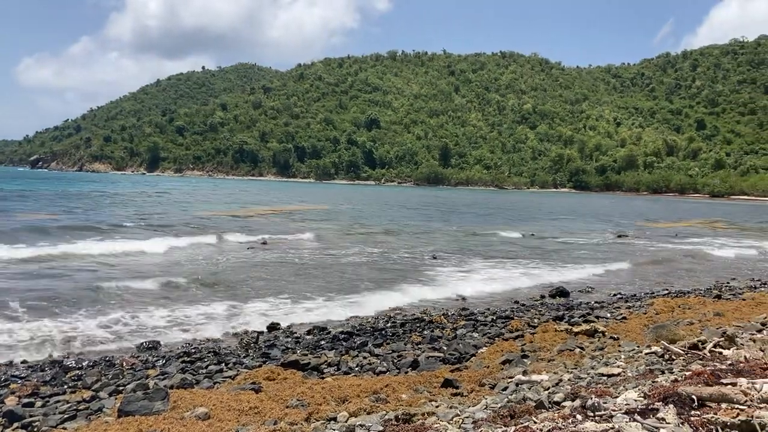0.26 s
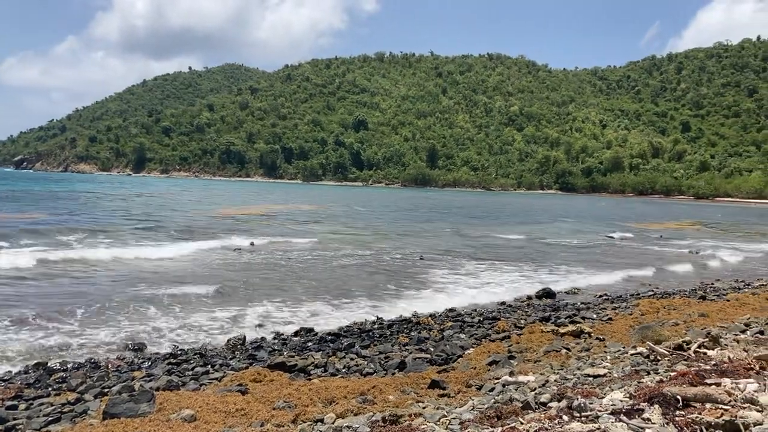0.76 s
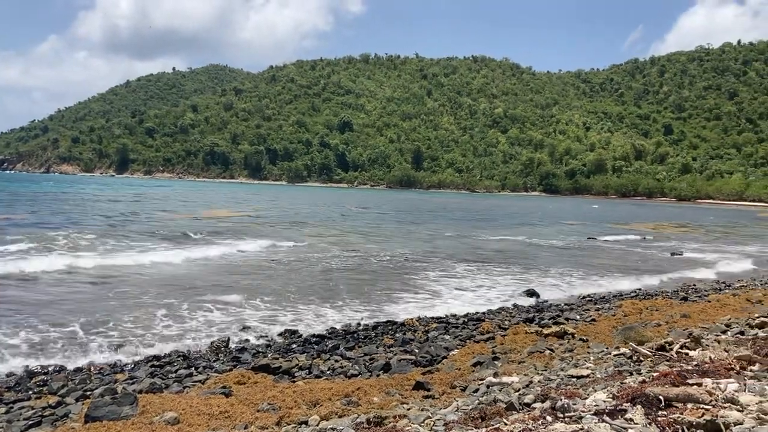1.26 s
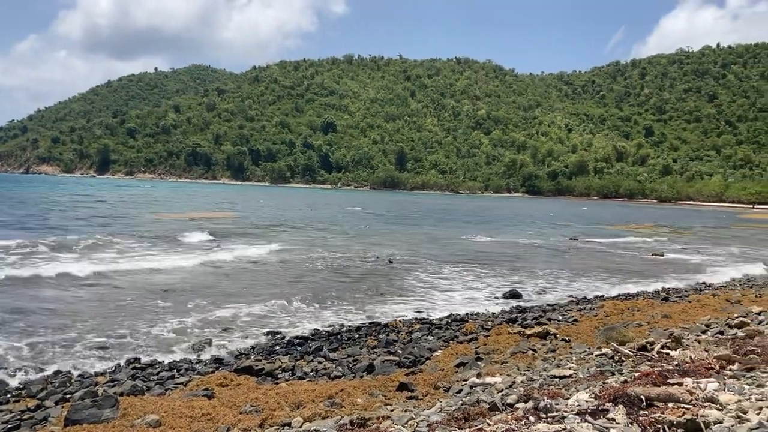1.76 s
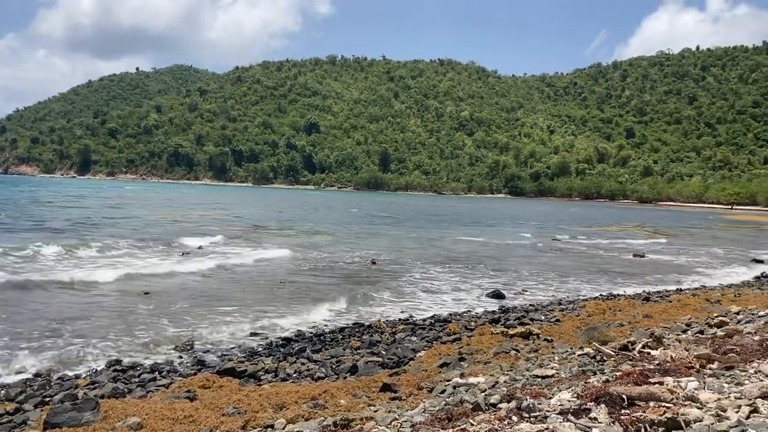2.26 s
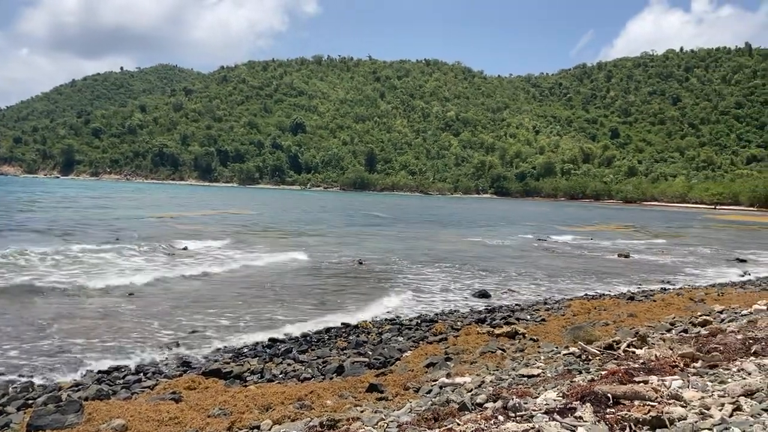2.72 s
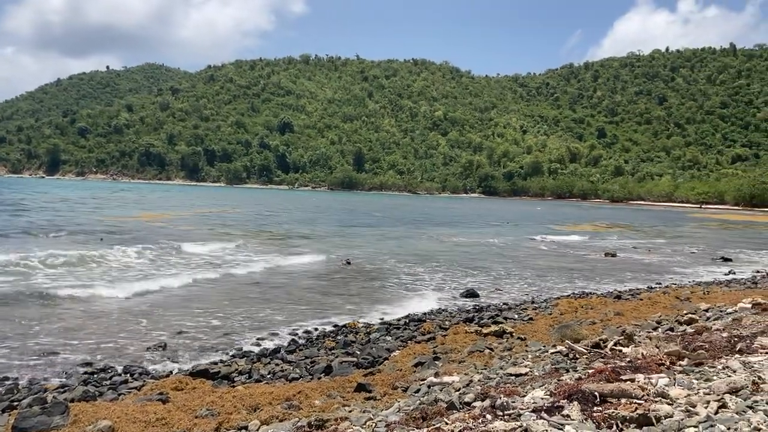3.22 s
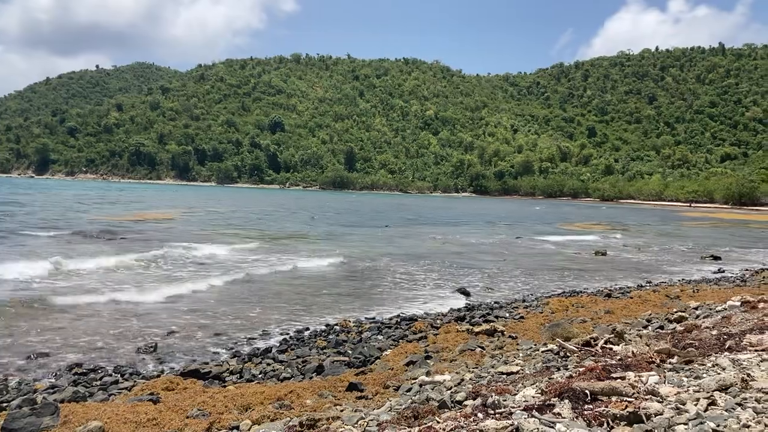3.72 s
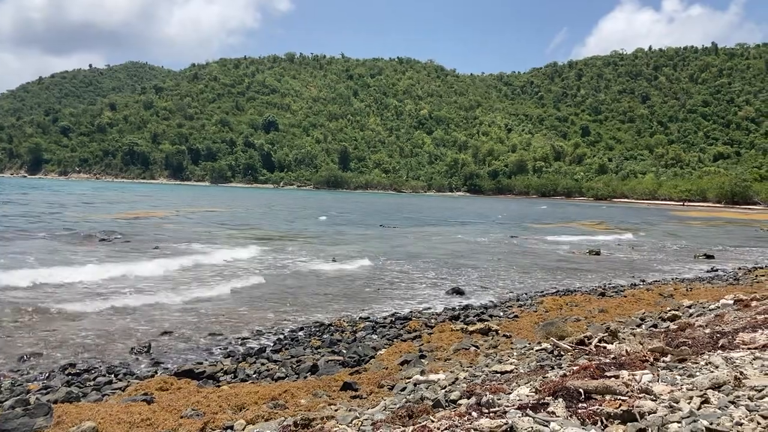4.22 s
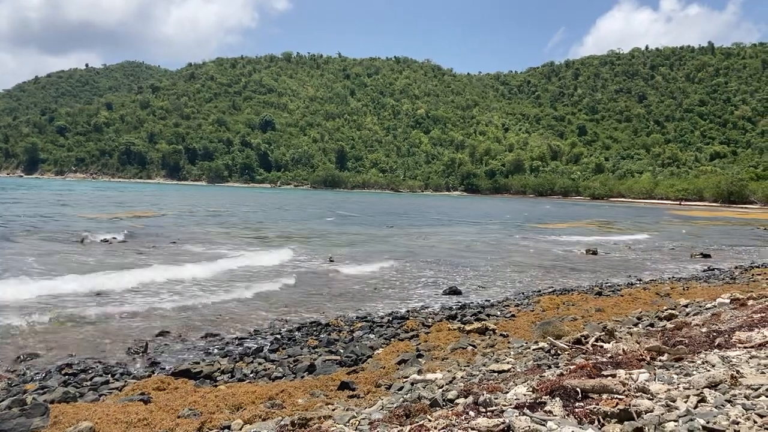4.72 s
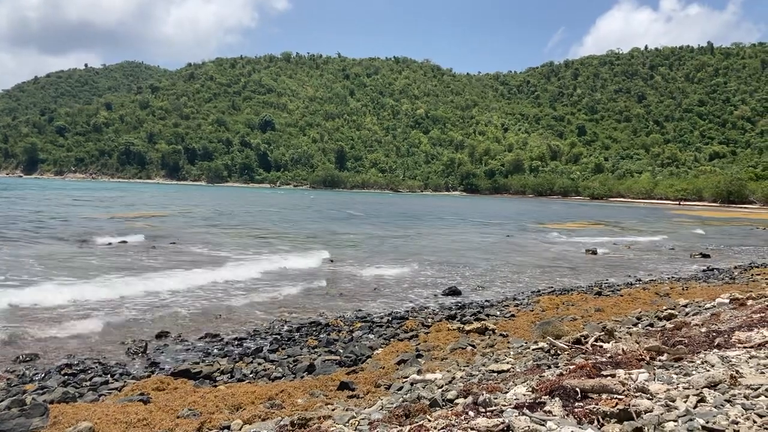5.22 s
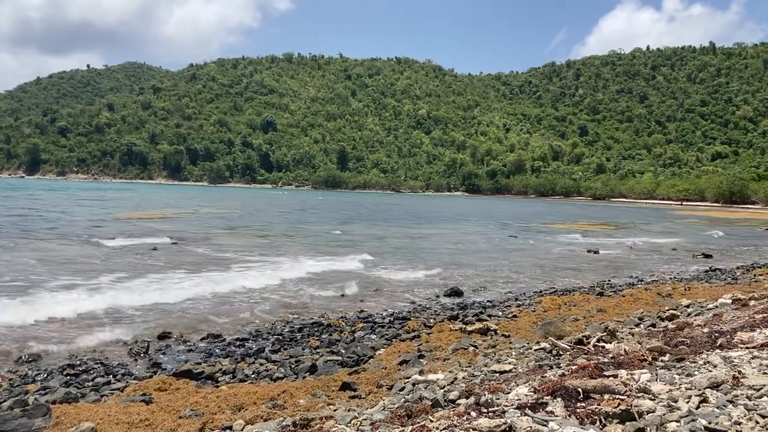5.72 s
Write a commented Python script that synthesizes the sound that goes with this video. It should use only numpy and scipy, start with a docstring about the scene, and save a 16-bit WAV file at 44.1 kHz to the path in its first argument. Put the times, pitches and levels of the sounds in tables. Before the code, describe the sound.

Close, steady surf wash on cobbles, mid-toned with soft fizz and watery gurgle, spread wide in stereo. Over it, breeze strikes an unshielded handheld microphone as short, dull, irregular thuds and flutters, mostly central. They begin strongly, thin out between one and two seconds, return lightly, and become dense and booming in the last second and a half. Open air, no echo.

```python
"""A cobble beach: small waves break and wash to the left of a hand-held stereo microphone.
The surf is noise in third-octave bands that swell, with ringing bubbles; each port has its own colour,
and a phase lead and partial coherence set the two apart. A breeze buffets the ports in low lumps, as
coloured noise and short swings; for the first two seconds the low wind noise is also wide, with a part
of opposite sign on the two sides."""
import sys
import numpy as np
from scipy import signal
from scipy.fft import rfft, irfft
from scipy.io import wavfile
from scipy.ndimage import uniform_filter1d

SR = 44100
rng = np.random.default_rng(int(sys.argv[2]) if len(sys.argv) > 2 else 0)


def dump_mix(stems):
    """Bounce the given channels to the path in sys.argv[1] as a 16-bit WAV at rate SR."""
    frames = np.atleast_2d(stems).T  # one column per channel
    limited = np.clip(frames, -1, 1)  # hard clip at full scale
    pcm = np.round(limited * 32767).astype(np.int16)
    wavfile.write(sys.argv[1], SR, pcm)


N = 263718
HZ = np.maximum(np.arange(N // 2 + 1) * SR / N, 1)  # frequency of each bin, kept above zero

# Single eddies at the ports. Each row: time in seconds, half of BUFFET_S before the middle of the swing,
# peak in dB before the bass cut, pitch in Hz.
BUFFETS = [(0.165, -20, 78), (0.236, -21, 92), (0.268, -25, 75), (.325, -22, 83), (.335, -21.5, 260),
           (.347, -15, 85), (.35, -28.5, 410), (.378, -26, 72), (0.401, -42, 65), (0.494, -24, 65),
           (0.544, -23, 70), (.575, -28, 233), (.585, -32, 380), (.612, -25, 62), (0.748, -27, 75),
           (0.769, -35, 75), (0.808, -31, 181), (0.913, -32, 70), (.997, -30.5, 225), (1.168, -29, 262),
           (1.238, -25.5, 268), (1.277, -33, 192), (1.34, -30.5, 190), (1.589, -27, 65),
           (1.661, -28.5, 211), (1.965, -30, 97), (2.324, -23, 70), (2.401, -24.5, 115), (2.51, -29, 110),
           (2.533, -24, 205), (2.55, -25, 100), (2.603, -28, 102), (2.613, -38, 323), (2.642, -27.5, 70),
           (2.87, -30, 81), (3.136, -28, 103), (3.249, -29, 150), (3.39, -30, 60), (3.47, -31, 55),
           (3.527, -20.5, 144), (3.635, -31, 70), (3.833, -28, 175), (3.976, -30.5, 237), (4.1, -28.5, 295),
           (4.124, -25, 179), (4.189, -22.5, 235), (4.21, -25, 125), (4.245, -24, 113), (4.558, -20, 110),
           (4.634, -30, 81), (4.67, -17, 80.5), (4.695, -17, 101), (4.731, -19.5, 148), (4.772, -25.5, 240),
           (4.801, -22, 103.4), (4.857, -21, 98), (5.159, -31, 94), (5.214, -35, 550), (5.222, -22, 79),
           (5.259, -28, 75), (5.306, -24, 70), (5.375, -31, 300), (5.389, -27, 75), (5.489, -19, 123),
           (5.564, -24, 260), (5.574, -16.5, 91), (5.645, -30, 130), (5.694, -22.5, 102), (5.697, -36, 523),
           (5.792, -22, 79.4), (5.815, -24, 102), (5.901, -28, 75), (5.937, -19, 125)]
BUFFET_S = 0.02626  # shortest swing, in seconds
# Spectra of the low and middle wind registers. Each row: frequency in Hz, relative density in dB per Hz.
THUD = [(20, -34), (35, -13), (55, -3), (80, 0), (98, -7), (135, -36), (400, -90)]
FLUTTER = [(20, -70), (60, -32), (90, -21.5), (125, -1), (170, -4.5), (210, -6.5), (300, -61), (800, -90)]


def from_db(db):
    """Decibels to amplitude gain: 20 dB is a factor of ten."""
    return 10 ** (np.asarray(db) / 20)


def rms_one(x):
    """Normalisation to unit root-mean-square."""
    return x / np.sqrt(np.mean(x ** 2) + 1e-20)


def in_time(rows):
    """Linear interpolation of each column over the seconds in the first, sample by sample."""
    seconds, *columns = np.transpose(rows)
    return [np.interp(np.arange(N) / SR, seconds, column) for column in columns]


def over_hz(points):
    """Interpolation on a logarithmic frequency axis, bin by bin."""
    hz, value = np.transpose(points)
    return np.interp(np.log(HZ), np.log(hz), value)


def drift(corner_hz):
    """Slow random modulation of unit rms: noise through two equal one-pole low-passes."""
    step = 40  # samples between the coarse values
    pole = np.exp(-2 * np.pi * corner_hz * step / SR)
    noise = rng.standard_normal(N // step + 2002)
    slow = signal.lfilter([1], [1, -2 * pole, pole * pole], noise)[2000:]  # drop the onset
    return np.interp(np.arange(N) / step, np.arange(len(slow)), rms_one(slow))


def high_pass(x, hz, order):
    """Zero-phase Butterworth magnitude: a bass cut without delay."""
    return irfft(rfft(x) / np.sqrt(1 + (hz / HZ) ** (2 * order)), N)


def foam(fizz_db, body_db, patchy_db, together_db):
    """Amplitude-modulated band noise: third-octaves swell independently, and slightly in common."""
    swell_db = 1.13
    edges = 100 * 2 ** (np.arange(24) / 3)
    white = rng.standard_normal((2, N))
    together = together_db * drift(2.0)
    out = 0
    for k, (low, high) in enumerate(zip(edges[:-1], edges[1:])):
        band_pass = signal.butter(2, [low, high], "band", fs=SR, output="sos")
        band = signal.sosfilt(band_pass, white[k % 2])
        treble = np.clip(np.log2(low / 2500) / 2, 0, 1)
        bass = np.clip(np.log2(1100 / low) * 2, 0, 1)
        own_db = patchy_db * drift(11.3) + swell_db * drift(2.8)
        out = out + band * from_db(treble * fizz_db + bass * body_db + together + own_db)
    return rms_one(out)


def bubbles(per_s, cycles):
    """Damped resonance of trapped air: random pops, clustered by pitch, fall 60 dB in the given cycles."""
    cluster_db, cluster_hz = 5.0, 6.0  # swing of the rate of pops, and corner of that swing
    sizes = from_db(2.0 * np.minimum(rng.exponential(1, N), 4)) * rng.choice([-1, 1], N)
    dealt, chance = rng.integers(0, 36, N), rng.random(N)  # which pitch a pop would take
    born = [chance < per_s * from_db(cluster_db * drift(cluster_hz)) / SR for register in range(6)]
    out = 0
    for k, hz in enumerate(np.geomspace(1050, 8000, 36)):
        r, w = from_db(-60 * hz / (cycles * SR)), 2 * np.pi * hz / SR
        pops = np.sqrt(hz) * sizes * born[k // 6] * (dealt == k)
        # the tiny offset avoids denormal numbers
        out = out + signal.lfilter([0, np.sin(w)], [1, -2 * r * np.cos(w), r * r], pops + 1e-18)
    return rms_one(out)


def surf():
    """Partial coherence: one wash reaches both ports with a phase lead, a scattered one the right alone."""
    # The wash. Each row: time in seconds, surf level in dB in the middle band, treble boost in dB,
    # bass boost in dB.
    wash = [(0, -37.5, -3, 1.5), (.4, -37.5, -0.5, 1), (.8, -38, -.5, -0.5), (1.15, -37.5, .5, 1.5),
            (1.45, -38, 1.5, 2.5), (1.85, -39.5, -0.5, 1.5), (2.2, -39, -1.5, 2), (2.55, -39.5, 1.5, 4),
            (2.9, -38.5, -0.5, 2.5), (3.3, -38.5, -0.5, 4), (3.7, -36.5, -1, 2), (4.0, -38, -0.5, 4.5),
            (4.25, -37.5, -.5, 3.5), (4.55, -37.5, 0.5, 3), (4.9, -39, .5, 3.5), (5.25, -38.5, 0, 0.5),
            (5.6, -40, -0.5, 2.5), (5.98, -39.5, -1, 0)]
    # Colour of the surf at each port. Each row: frequency in Hz, gain in dB.
    left_colour = [(380, -8), (450, -.5), (510, 0), (620, -.5), (770, -.2), (880, -5.8), (1010, -3.2),
                   (1200, -.6), (1300, -1.6), (1450, -4.5), (1650, -3), (2500, -7.2), (2750, -10.6),
                   (3050, -9.8), (3600, -13.3), (4050, -11), (6300, -17), (7300, -18), (9500, -15.8),
                   (12500, -21), (14200, -28), (15800, -29)]
    right_colour = [(400, -7.3), (480, -5.2), (590, -8.4), (720, -2), (790, -2.4), (880, -6), (1010, -2.3),
                    (1120, -4.4), (1350, -5.5), (1640, -.4), (1900, -6.3), (2580, -6), (2850, -12.7),
                    (3250, -12.8), (4000, -10.2), (6300, -16), (7200, -17.8), (9500, -15.8), (12500, -21),
                    (14200, -28), (15800, -29)]
    # Phase lead of the right side; the slope is its advance. Each row: frequency in Hz, lead in radians.
    phase_lead = [(100, 0), (300, .3), (420, .1), (520, -.7), (770, -1.3), (1000, -3), (1080, -3.5),
                  (1240, -7), (1500, -9.4), (1640, -10), (2150, -11.9), (2400, -13), (2750, -15.9),
                  (3450, -19.2), (4050, -22.3), (4350, -23.9), (4850, -25), (5600, -27.5), (6050, -27.7),
                  (6400, -25.4), (7000, -25.1), (16000, -12.3)]
    # Coherence between the sides. Each row: frequency in Hz, shared part from 0 to 1.
    coherence = [(300, .8), (430, .15), (560, .55), (720, .92), (990, .89), (1170, .1), (1400, .42),
                 (1640, .85), (2000, .52), (2300, .58), (2500, .45), (2750, .5), (3300, .2), (4800, .3),
                 (5200, .1), (5800, .37), (6100, .1), (6600, .57), (7100, .8), (7900, .7), (8400, .88),
                 (9000, .985), (10000, .8), (11300, .95), (12200, .8), (16000, .85)]
    bubbles_db = -8.5
    surf_db, fizz_db, body_db = in_time(wash)
    near = foam(fizz_db, body_db, patchy_db=.7, together_db=.3)
    near = near + from_db(bubbles_db) * bubbles(per_s=1200, cycles=40.0)
    scattered = foam(fizz_db, body_db, patchy_db=1.0, together_db=.4)
    scattered = scattered + from_db(bubbles_db) * bubbles(per_s=1200, cycles=40.0)

    shared = np.clip(over_hz(coherence), 0, 1)
    lead = np.exp(1j * np.interp(HZ, *np.transpose(phase_lead)))
    left = rfft(near)
    right = shared * lead * left + np.sqrt(1 - shared ** 2) * rfft(scattered)
    bass_db = 16 * np.minimum(np.log2(HZ / 370), 0)  # falls 16 dB per octave below 370 Hz
    sides = np.array([left * from_db(over_hz(left_colour) + bass_db),
                      right * from_db(over_hz(right_colour) + bass_db)])
    middle_band = (HZ > 1000) * (HZ < 2600)
    middle = irfft(sides.mean(axis=0) * middle_band, N)
    return from_db(surf_db) * irfft(sides, N) / np.std(middle)


def eddies(colour):
    """Spectrally shaped noise with compressed envelope: successive eddies are of like strength."""
    even = 0.81  # 0 leaves the swells alone, 1 levels them most
    x = rms_one(irfft(rfft(rng.standard_normal(N)) * from_db(over_hz(colour)), N))
    strength = uniform_filter1d(uniform_filter1d(x ** 2, size=900), size=900) + 0.039
    return x / strength ** (even / 2)


def turbulence(levels_db, colours, lumpy_db):
    """Common modulation of turbulent noise: small gusts make all registers swell together."""
    lumps = from_db(lumpy_db * drift(24.7))
    registers = (rms_one(lumps * eddies(colour)) for colour in colours)
    return sum(from_db(level_db) * x for level_db, x in zip(levels_db, registers))


def breeze_db():
    """Envelopes of the wind registers: the steady breeze, or a gust that rises, holds and falls above it."""
    # Steady breeze. Each row: time in seconds, thud in dB, flutter in dB, rustle in dB.
    steady = [(0, -44, -43, -39), (.95, -40, -42.5, -41.5), (1.08, -49, -51, -44.5),
              (1.4, -44.5, -58, -39.5), (1.7, -44, -58, -43.5), (1.9, -49, -48.5, -49),
              (2.2, -41.5, -44, -44), (3.0, -44.5, -43.5, -44), (3.5, -46, -41.5, -42),
              (4.0, -41.5, -40, -41), (4.45, -39, -40, -40.5), (4.95, -41, -40, -44), (5.45, -40, -42, -46),
              (5.98, -46, -38, -42)]
    # Gusts. Each row: start of the hold in seconds, hold in seconds, thud, flutter and rustle in dB.
    gusts = [(0.17, 0.032, -28.5, -47, -41), (0.222, 0.021, -31, -39, -32), (0.275, 0.036, -25, -45, -35),
             (0.334, 0.039, -20.5, -28.5, -39.5), (0.347, 0.031, -40, -40, -30.5),
             (0.48, 0.046, -29, -36.5, -37), (0.553, 0.13, -42, -37.5, -37.5),
             (0.754, 0.031, -30.5, -37, -44), (0.914, 0.071, -39, -43, -40.5), (1.58, 0.033, -52, -46, -40),
             (1.96, 0.028, -42, -53, -52), (2.31, .03, -39, -43, -40.5), (2.4, 0.055, -41, -40, -45.5),
             (2.47, .04, -37, -34.5, -42), (2.53, 0.028, -36.5, -35, -35), (2.6, 0.043, -38, -36.5, -38),
             (2.69, 0.042, -45, -37.5, -39), (3.125, 0.023, -36, -39, -41.5), (3.522, 0.069, -38, -36, -37),
             (4.11, 0.25, -37, -39, -37), (4.54, 0.095, -29, -44, -37), (4.668, 0.07, -37.5, -30.5, -33),
             (4.775, .055, -30, -32, -37.5), (4.994, 0.044, -36.5, -37, -42),
             (5.085, 0.1, -34.5, -33.5, -38.5), (5.214, 0.12, -30.5, -31.5, -37.5),
             (5.371, 0.039, -29, -33, -46), (5.496, 0.017, -29, -28.5, -46), (5.573, 0.065, -32, -31, -42),
             (5.685, 0.02, -30.5, -31, -39.5), (5.802, 0.05, -32, -36, -41.5),
             (5.894, 0.094, -28.5, -29.5, -35)]
    rise_db_per_s, fall_db_per_s = 500, 400
    spray_db = np.array((-30, -29.5, -22.5))  # a buffet stirs the registers, this far from its peak
    t, levels_db = np.arange(N) / SR, np.array(in_time(steady))
    stirs = [(s + BUFFET_S / 4, BUFFET_S / 2, *(db + spray_db)) for s, db, hz in BUFFETS]
    for start, hold, *peak_db in [*gusts, *stirs]:
        end = start + hold
        near = slice(int(max(start - .3, 0) * SR), int((end + .3) * SR))
        shape_db = np.minimum(rise_db_per_s * (t[near] - start), fall_db_per_s * (end - t[near]))
        gust_db = np.array(peak_db)[:, None] + np.minimum(shape_db, 0)
        levels_db[:, near] = np.maximum(levels_db[:, near], gust_db)
    return levels_db


def breeze():
    """Turbulent pressure common to both ports, in three registers of noise."""
    # Spectrum of the highest register. Each row: frequency in Hz, relative density in dB per Hz.
    rustle = [(40, -70), (120, -26), (175, -3), (240, 5), (320, 0.5), (420, -14), (600, -30), (2000, -88)]
    return turbulence(breeze_db(), (THUD, FLUTTER, rustle), lumpy_db=1.5)


def wide_wind():
    """Antiphase: low wind noise of opposite sign on the two sides, its width changing over two seconds."""
    # Each row: time in seconds, thud in dB and flutter in dB before the bass cut.
    width_levels = [(0, -70, -50), (.2, -67, -40), (.38, -55, -29), (.46, -48, -42), (.56, -36, -36),
                    (.7, -42, -50), (.82, -36, -45), (.95, -35, -45), (1.15, -47, -47), (1.4, -45, -40),
                    (1.6, -44, -42), (1.8, -42, -42), (1.95, -62, -41), (2.2, -90, -79)]
    noise = turbulence(in_time(width_levels), (THUD, FLUTTER), lumpy_db=2.5)
    return high_pass(noise, 62, order=4)


def buffets():
    """Phase modulation: each eddy swings the diaphragm a few cycles, and a lopsided swing has overtones."""
    least_cycles, glide_share = 2.03, 0.48  # the pitch is off by up to this share at either end
    out, chance = np.zeros(N + SR), rng.random((len(BUFFETS), 3))
    for (s, peak_db, hz), (turn, glide, skew) in zip(BUFFETS, chance):
        length = np.clip(max(BUFFET_S, least_cycles / hz), .01, .08)
        t = np.arange(int(length * SR)) / SR - length / 2
        phase = 2 * np.pi * (turn + hz * t * (1 + glide_share * (glide - .5) * t / t[-1]))
        swing = np.sin(phase + 0.44 * skew * np.sin(phase + 1)) * np.hanning(len(t))
        at = int((s + BUFFET_S / 2 - length / 2) * SR)  # longer swings keep the same middle
        out[at:at + len(t)] += from_db(peak_db) * swing
    return high_pass(out[:N], 31, order=3)


def scene():
    """Sum and difference: common wind in the sum; surf spread, skewed gusts and wide wind in the difference."""
    diaphragm_top = .28  # amplitude at which the wind saturates
    left, right = surf()
    wind = breeze() + buffets()
    wind = diaphragm_top * np.tanh(wind / diaphragm_top)
    skewed = from_db(-15.5) * np.roll(wind, SR // 1000)  # gusts reach the ports slightly out of step
    # below 210 Hz the surf is alike on both sides
    side = high_pass((left - right) / 2 + skewed, 210, order=10) + wide_wind()
    return (left + right) / 2 + wind + side * [[1], [-1]]


def record(dry):
    """Elliptic low-pass: the top is cut steeply."""
    cutoff_hz = 15720
    low_pass = signal.ellip(12, .5, 80, cutoff_hz, fs=SR, output="sos")  # .5 dB ripple, 80 dB stop band
    return signal.sosfilt(low_pass, dry)


dry = scene()
out = record(dry)
dump_mix(out)
```